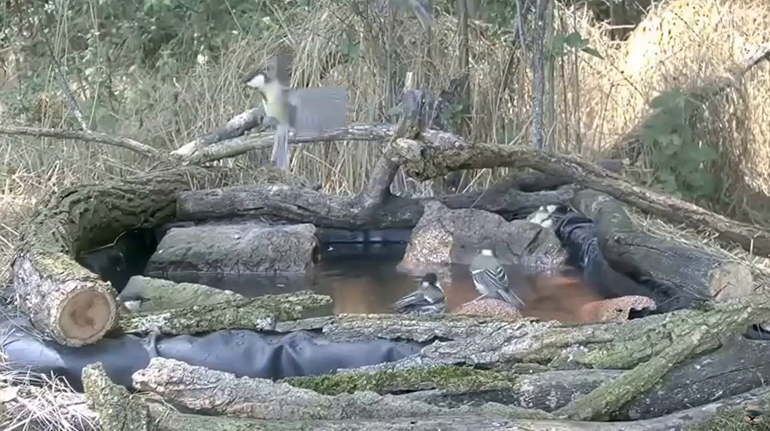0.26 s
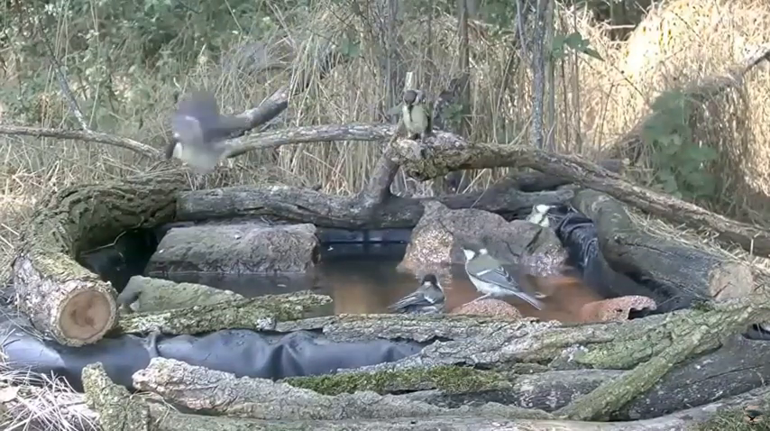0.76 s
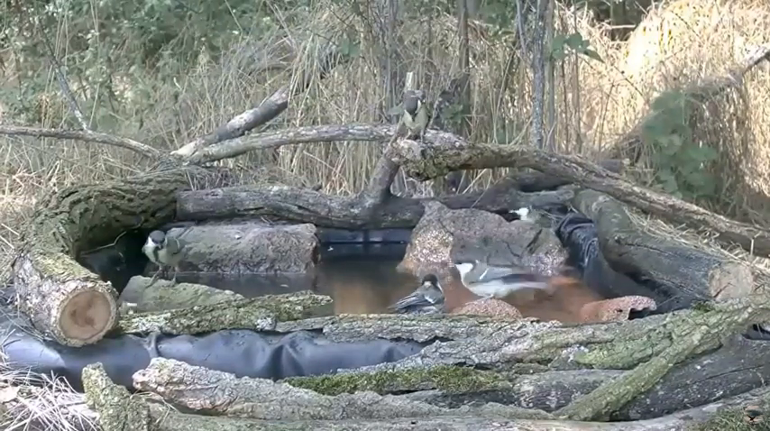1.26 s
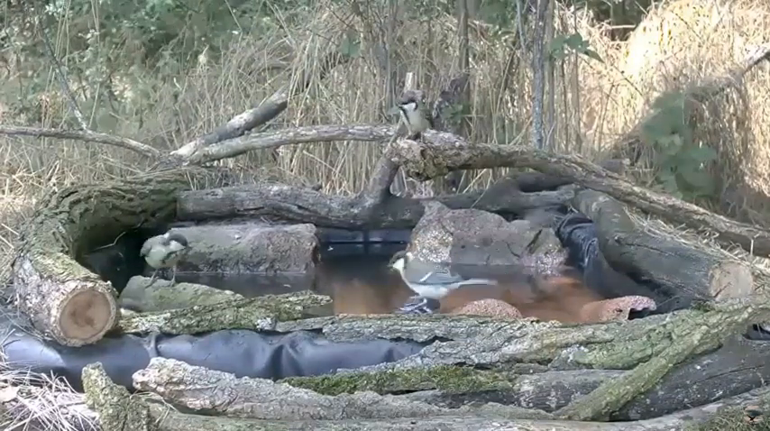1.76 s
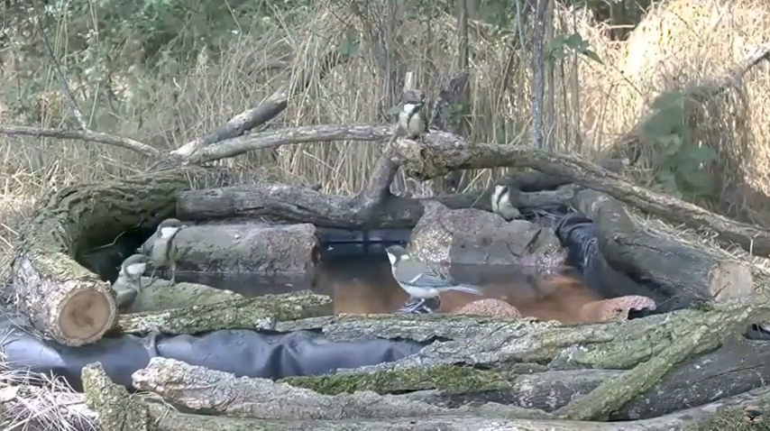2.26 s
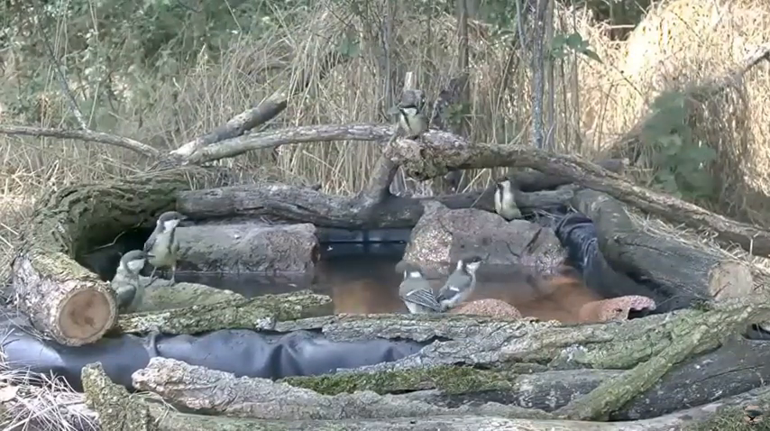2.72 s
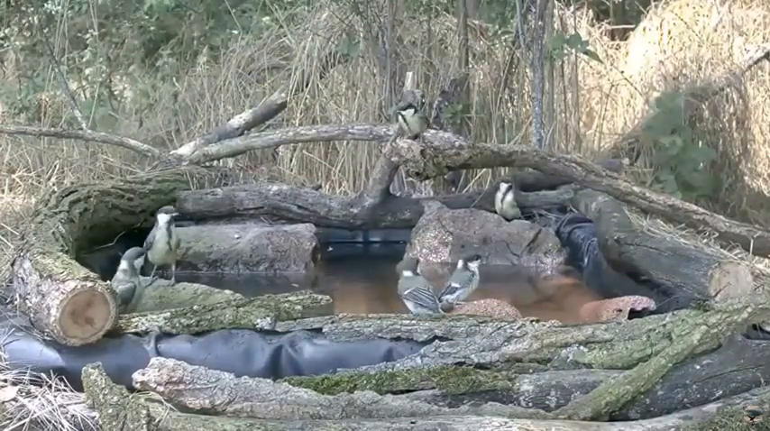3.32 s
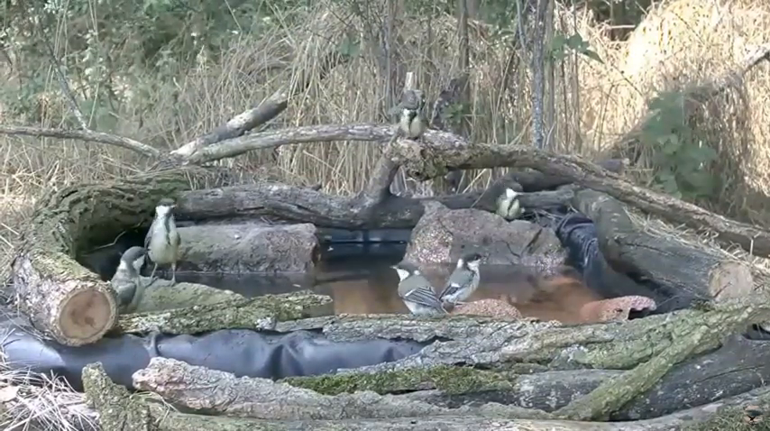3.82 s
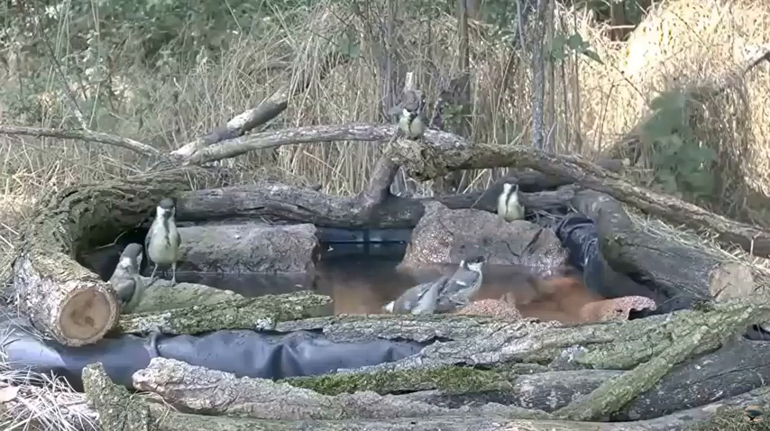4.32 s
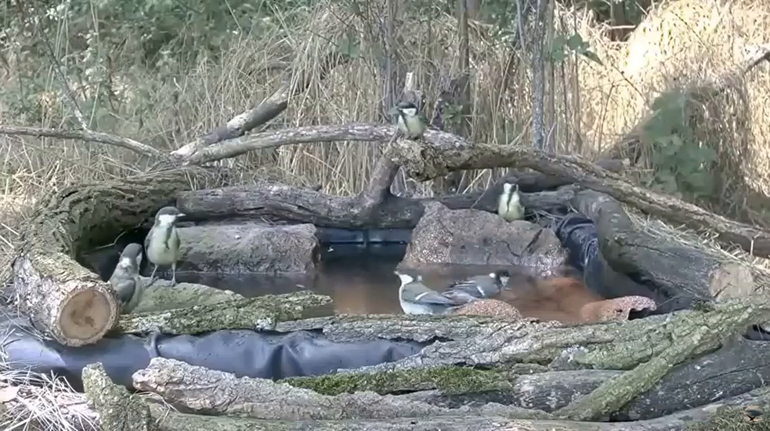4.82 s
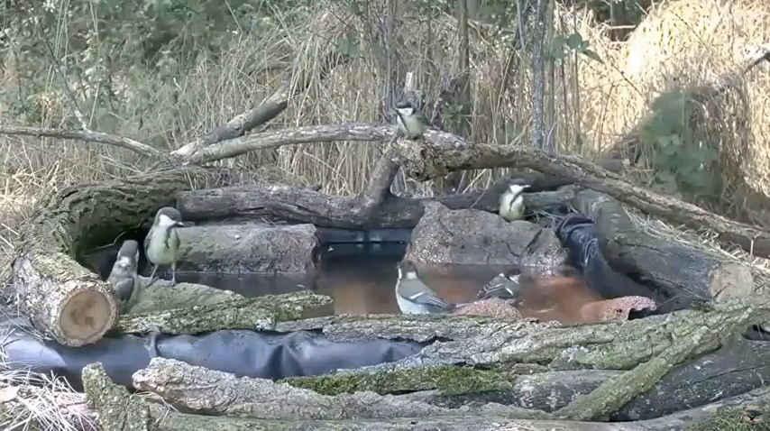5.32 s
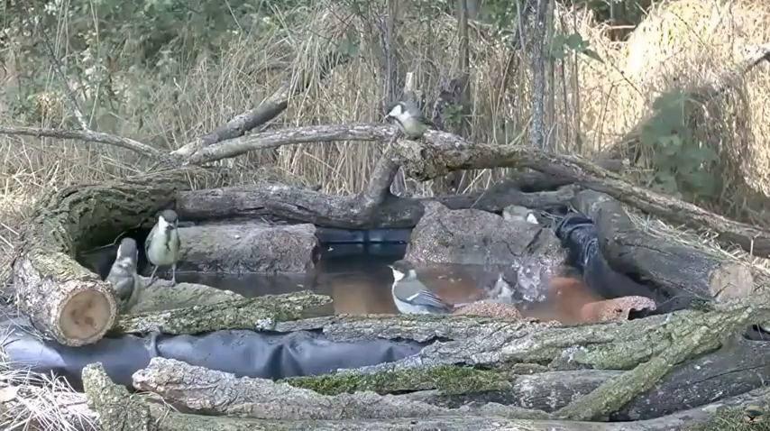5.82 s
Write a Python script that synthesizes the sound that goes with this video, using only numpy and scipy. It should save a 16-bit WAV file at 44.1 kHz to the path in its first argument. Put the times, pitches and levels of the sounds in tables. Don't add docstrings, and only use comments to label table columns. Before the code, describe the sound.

Outdoors, a small microphone sits close to a shallow pool where small songbirds bathe. A soft, breathing hiss of leaves and far traffic runs throughout, with low hum and lumpy air rumble. From 0 s wings flutter, wet feathers rustle and water sloshes; sharp ticks and a wood snap come at about 0.1 s, and a small splash at 0.6 s. Soft low wing thumps cluster around 1.6-1.75 s. A bubble plops at 1.9 s, and two hoarse, very high, tiny arched chirps follow at 1.93 and 2.0 s. A thin whistle and third chirp come at 2.6 s. It then calms, with wing puffs near 3.75 s and faint far whistles around 3.7-4.3 s. From 4.6 s bathing spray trickles; two lower, raspy chirps sound at 4.8 and 4.9 s over thin whistles. Loud snaps hit at 5.2 and 5.75 s, wings thump at 5.4 s, and splashing swells into a strong wing burst at 6.03 s.

```python
import sys
import numpy as np
from scipy import signal
from scipy.fft import rfft, irfft
from scipy.io import wavfile
from scipy.ndimage import uniform_filter1d

SR = 44100
rng = np.random.default_rng(int(sys.argv[2]) if len(sys.argv) > 2 else 0)


def put_to_file(sound):
    columns = np.atleast_2d(sound).T
    safe = np.clip(columns, -1, 1)
    whole_steps = np.round(safe * 32767)
    wavfile.write(sys.argv[1], SR, whole_steps.astype(np.int16))


def amplitude_ratio(level_db):
    exponent = np.asarray(level_db, float) / 20
    return 10 ** exponent


N = 268112


def rms_one(x):
    return x / np.sqrt(np.mean(x ** 2) + 1e-20)


def band(x, low_hz, high_hz):
    sos = signal.butter(2, [low_hz, min(high_hz, .45 * SR)], "band", fs=SR, output="sos")
    return signal.sosfilt(sos, x)


def drift(rate_hz):
    r = np.exp(-2 * np.pi * rate_hz / SR)
    slow = signal.lfilter([1], [1, -2 * r, r * r], rng.standard_normal(N + SR))[SR:]
    return rms_one(slow - slow.mean())


def coloured(x, spectrum):
    hz, level_db = np.transpose(spectrum)
    grid_hz = np.fft.rfftfreq(len(x), 1 / SR) + 1e-3
    gain_db = np.interp(np.log(grid_hz), np.log(hz), level_db, -90, -90)
    return rms_one(irfft(rfft(x) * amplitude_ratio(gain_db), len(x)))


def grains(per_s, spread_db, on_noise):
    sizes = amplitude_ratio(spread_db * np.minimum(rng.exponential(1, N), 5)) * rng.choice([-1, 1], N)
    clicks = sizes * (rng.random(N) < per_s / SR)
    return rms_one(clicks) + on_noise * rng.standard_normal(N)


def add(out, s, sound):
    at = int(s * SR)
    out[at:at + len(sound)] += sound[:N - at]


def bouts(rows, rest_db):
    t, power = np.arange(N) / SR, amplitude_ratio(2 * rest_db)
    for s, level_db, swell_s, ebb_s in rows:
        fall_db = 10 * np.where(t < s, (s - t) / swell_s, (t - s) / ebb_s)
        power = power + amplitude_ratio(2 * (level_db - fall_db))
    return 10 * np.log10(power)


def bushes(x):
    t = np.arange(SR // 2) / SR
    dying = amplitude_ratio(-60 * t / 0.33) + 2 * amplitude_ratio(-60 * t / .08)
    cloud = rng.standard_normal(len(t)) * dying * (t > .002)
    return signal.fftconvolve(x, cloud / np.sqrt(np.sum(cloud ** 2)))[:N]


# pitch_hz, level_db (per Hz)
HAZE_SPECTRUM = [(200, -14), (400, -16.5), (750, -15), (1000, -20.5), (1500, -20.5), (3300, -24),
                 (4500, -22.5), (5700, -29.5), (8000, -24.5), (11000, -26), (16000, -25.5)]


def haze():
    hiss = [coloured(rng.standard_normal(N), HAZE_SPECTRUM) for _ in range(2)]
    together, out = drift(22), 0
    for k, low_hz in enumerate(310 * 2 ** np.arange(6)):
        breathing = amplitude_ratio(.7 * together + .9 * drift(14))
        out = out + breathing * band(hiss[k % 2], low_hz, 2 * low_hz)
    return amplitude_ratio(-47.5) * rms_one(out)


# pitch_hz, level_db (per Hz)
RUMBLE_SPECTRUM = [(15, -11), (35, -1.5), (70, -0.5), (110, -3), (200, -2.5)]
# pitch_hz, level_db (per Hz)
HUM_SPECTRUM = [(60, -11), (120, -5.5), (200, 0), (300, -0.5), (400, -11.5), (600, -24.5)]
# height_s, rumble_db, swell_s, ebb_s
PUFFS_OF_AIR = [(.09, -32.5, 0.079, 0.079), (.4, -33.5, 0.041, 0.12), (.54, -30.5, .02, 0.16),
                (.72, -41, 0.036, 0.039), (1.08, -35.5, 0.024, 0.094), (1.45, -34.5, 0.17, 0.3),
                (1.65, -26, 0.051, 0.057), (1.75, -31, 0.056, 0.089), (1.96, -36.5, 0.12, .02),
                (2.15, -44, .04, 0.057), (2.41, -35, 0.089, .04), (3.76, -34.5, 0.075, 0.2),
                (3.93, -42, 0.087, 0.13), (4.37, -38, 0.12, 0.049), (5.21, -38, 0.029, 0.14),
                (5.45, -25, 0.052, 0.044), (5.94, -42, 0.085, 0.035), (6.07, -26.5, 0.061, 0.046)]


def gusts():
    puff_db = bouts(PUFFS_OF_AIR, rest_db=-55)
    rumble = amplitude_ratio(puff_db - 1.5 + 3 * drift(15)) * coloured(rng.standard_normal(N), RUMBLE_SPECTRUM)
    hum = np.hypot(amplitude_ratio(-45.5 + 1.43 * drift(1.75)), amplitude_ratio(puff_db - 8.5))
    return rumble + hum * amplitude_ratio(1.8 * drift(16)) * coloured(rng.standard_normal(N), HUM_SPECTRUM)


# start_s, level_db
FLYING = [(0.0, -44), (0.3, -43), (0.6, -49.5), (1.07, -46.5), (1.3, -50.5), (1.83, -48), (2.2, -52.5),
          (2.55, -50), (3.05, -50), (3.3, -54), (3.8, -50), (4.4, -52.5), (5.05, -55), (5.6, -56.5),
          (6.08, -48.5)]
# height_s, spray_db, swell_s, ebb_s
BATHING = [
    (0.59, -45.5, .1, 0.18),
    (4.72, -45.5, 0.16, 0.6),
    (5.3, -45.5, 0.094, 0.19),
    (5.78, -48, .1, 0.11),
    (5.93, -43, 0.3, 0.086),
    (6.06, -42.5, 0.047, 0.032),
]


def stir():
    s, level_db = np.transpose(FLYING)
    return np.interp(np.arange(N) / SR, s, level_db), bouts(BATHING, rest_db=-66)


# pitch_hz, level_db (per Hz)
FEATHER_SPECTRUM = [(3000, -12), (5500, -8), (7000, 3), (9000, -1.5), (11000, -4.5), (15500, -18)]


def rustle(rustle_db, beat_db):
    feathers = coloured(grains(per_s=2000, spread_db=3.5, on_noise=1), FEATHER_SPECTRUM)
    return amplitude_ratio(rustle_db - 0.5 + beat_db) * feathers


# pitch_hz, level_db (per Hz)
SLOSH_SPECTRUM = [(500, -0.5), (1000, -7.5), (1500, 0), (2200, -8), (4000, -15)]


def slosh(flutter_db, beat_db):
    slosh_db = -53.5 + 1.51 * (flutter_db + 50.5)
    pool = coloured(grains(per_s=300, spread_db=3.5, on_noise=1.25), SLOSH_SPECTRUM)
    return amplitude_ratio(slosh_db - 3.0 + beat_db) * pool


def trickle(spray_db):
    clicks = grains(per_s=630, spread_db=4.5, on_noise=0.9)
    dealt, out = rng.integers(0, 8, N), 0
    for k, hz in enumerate(np.geomspace(2350, 3600, 8)):
        r, w = amplitude_ratio(-60 * hz / (40.0 * SR)), 2 * np.pi * hz / SR
        out = out + signal.lfilter([np.sin(w)], [1, -2 * r * np.cos(w), r * r], clicks * (dealt == k))
    level_db = 10 * np.log10(amplitude_ratio(2 * -57) + amplitude_ratio(2 * (spray_db + 5)))
    return amplitude_ratio(level_db - 9.5) * rms_one(out)


def specks(rustle_db):
    when, size, dull, airy = rng.random((70, 4)).T
    s = when * (N / SR - .1)
    level_db = rustle_db[(s * SR).astype(int)] + 20 + 5 * (2 * size - 1)
    return list(zip(s, level_db, 2 - 20 * dull, -4 - 20 * airy))


# start_s, peak_db, dull_db (re peak), airy_db (re peak)
DROP_TICKS = [(0.023, -17, -10, -16), (0.0486, -26.5, -20, -27), (0.118, -6, -12, -21),
              (0.193, -19, -8, -12), (0.33, -10.5, -9, -10), (0.379, -13, -5, -9), (0.624, -17, -13, -18),
              (0.7073, -20, -2, -17), (0.946, -16, -8, -20), (0.9946, -19, -7, -21),
              (1.102, -12, -8.5, -12), (1.510, -15.5, -6, -7), (1.5657, -21, -6, -18),
              (1.5794, -20, -6, -4), (1.736, -18, -7, -9), (1.9002, -13, -0.5, -24),
              (2.196, -30.5, 9.5, -10), (3.6691, -19, -24, -27), (4.132, -18, -13, -19),
              (4.1922, -17.5, -6, -15), (4.5017, -13.5, -5, -21), (4.522, -17, -9, -16),
              (4.563, -15, -8, -9), (5.2035, -6.5, 0.5, -29), (5.3915, -19.5, -4, -1),
              (5.754, -11, -6, -29), (5.883, -9, -27, -12), (5.927, -35, -16, -22),
              (6.0184, -10.5, -22, -20), (6.042, -9, -9, -23)]


def ticks(rustle_db):
    out, t = np.zeros(N), np.arange(SR // 16) / SR
    sharpness = 0.56
    click = amplitude_ratio(-60 * t / 0.0033)
    spray = (1 - np.exp(-t / 0.00061)) * amplitude_ratio(-60 * t / 0.066)
    shape = sharpness * click + 0.37 * (1 - sharpness) * spray
    for s, peak_db, dull_db, airy_db in list(DROP_TICKS) + specks(rustle_db):
        burst = rng.standard_normal(len(t)) * shape
        bright = band(burst, 5500, 10000) + .3 * band(burst, 3300, 5500)
        parts = [bright, band(burst, 1100, 3300), band(burst, 10500, 16000)]
        bright, dull, airy = [p / np.abs(p).max() for p in parts]
        tick = bright + amplitude_ratio(dull_db) * dull + amplitude_ratio(airy_db) * airy
        add(out, s + 0.00048, amplitude_ratio(peak_db - 9.5) * tick)
    return out


# start_s, peak_db, pitch_hz
WING_STROKES = [(0.024, -22, 129), (0.115, -18.5, 129), (0.514, -18, 149), (1.09, -43, 242),
                (1.435, -24, 113), (1.627, -13, 79.5), (1.666, -11, 132), (1.736, -20, 167),
                (1.749, -14, 106), (2.137, -29, 116), (2.382, -29, 96), (3.728, -25, 141),
                (3.758, -14, 154), (3.774, -17, 112), (3.788, -13, 192), (5.396, -14.5, 88),
                (5.423, -16, 85.5), (5.432, -9.5, 135), (5.46, -18, 80), (5.477, -11, 141),
                (5.499, -25, 76), (6.016, -43, 191), (6.029, -6.5, 226), (6.041, -5, 134)]


def wings():
    out = np.zeros(N)
    for s, peak_db, hz in WING_STROKES:
        cycles = np.arange(int(4 * SR / hz)) * hz / SR
        swell = 2.0 * cycles / 0.84 * np.exp(-cycles / 0.58)
        swing = np.sin(2 * np.pi * cycles + rng.uniform(0, 2 * np.pi))
        add(out, s, amplitude_ratio(peak_db + 1.0) * swell * swing)
    return out


# start_s, peak_db
WOOD_SNAPS = [
    (.1205, -22),
    (.3797, -28),
    (1.0925, -32),
    (1.5112, -30),
    (4.744, -30),
    (5.1575, -30),
    (5.2052, -9),
    (5.7525, -26),
    (5.7556, -8),
    (5.8838, -27),
]


def snaps():
    clicks, pulse = np.zeros(N), np.array([1, -.6])
    for s, peak_db in WOOD_SNAPS:
        add(clicks, s, amplitude_ratio(peak_db + 4.5) * pulse)
        add(clicks, s + 0.00084, amplitude_ratio(peak_db - 18) * pulse)
    return band(clicks, 1500, 13000) + band(clicks, 6300, 10200)


# start_s, peak_db, pitch_hz, t60_s
BUBBLES = [(1.9076, -16.5, 1444, 0.012), (1.909, -26, 1120, 0.012), (1.6603, -36, 1660, 0.01),
           (4.707, -45, 3270, 0.028), (5.863, -41, 1500, 0.016), (6.02, -36, 645, 0.023),
           (4.805, -39, 370, 0.053), (2.628, -38, 1850, 0.017), (3.212, -49.5, 1835, 0.087),
           (3.4366, -47, 1750, 0.057), (4.134, -41.5, 1340, 0.017), (4.5698, -36.5, 1796, 0.055),
           (5.172, -43.5, 1660, 0.12), (5.184, -41.5, 1520, 0.043), (5.205, -19.5, 1120, 0.01),
           (5.205, -28, 725, 0.064), (2.291, -47.5, 1890, 0.035), (3.925, -49.5, 2180, 0.026),
           (5.206, -28, 955, 0.026), (5.7548, -33, 1790, 0.0062), (5.8915, -39, 2940, 0.022),
           (6.043, -41, 3080, 0.027), (6.0518, -24, 1418, 0.058)]


def plops():
    out, t = np.zeros(N), np.arange(SR // 8) / SR
    wobble_db = 3 * np.tile(drift(150), 2)
    for s, peak_db, hz, t60_s in BUBBLES:
        pitch_hz = hz * (1 + 0.11 * np.exp(-t / 0.0026) + 0.2 * t)
        rough_db = wobble_db[int(s * SR) - len(t) // 2:][:len(t)]
        shape = (1 - np.exp(-t / 0.00042)) * amplitude_ratio(-60 * t / t60_s + rough_db)
        add(out, s, amplitude_ratio(peak_db + 8.5) * shape * np.sin(2 * np.pi * np.cumsum(pitch_hz) / SR))
    return out


# start_s, length_s, level_db
HOARSE_BREATHS = [
    (1.912, 0.026, -17.5),
    (1.976, 0.03, -20.5),
    (2.629, 0.021, -15.5),
    (4.794, 0.025, -14.5),
    (4.861, 0.047, -18),
]


def rasps():
    out, white = np.zeros(N), rng.standard_normal(N)
    breath = rms_one(band(band(white, 7000, 10000), 7000, 10000))
    breath += amplitude_ratio(-10.5) * rms_one(band(white, 1900, 4600))
    breath += amplitude_ratio(-19) * rms_one(band(white, 9500, 14500))
    for s, length_s, level_db in HOARSE_BREATHS:
        n = int(length_s * SR)
        swell = np.sqrt(np.linspace(0, 1, n)) * signal.windows.tukey(n, .7)
        add(out, s, amplitude_ratio(level_db) * swell * breath[int(s * SR):][:n])
    return out


def arch(s, held, crest_hz, level_db, run_up, share, shoulder_db, crest_db, closing_db, crest):
    open_hz = 7210
    climb_s, climb_hz = .0055, 4335
    foot_hz = max(climb_hz - 270000 * (run_up - climb_s), 1692)
    bend_hz = foot_hz + 0.33 * (climb_hz - foot_hz)
    shoulder_hz = open_hz + share * (crest_hz - open_hz)
    shut = s + held
    return [(s - run_up, foot_hz, -41),
            (s - .5 * (run_up + climb_s), bend_hz, -31),
            (s - climb_s, climb_hz, -26),
            (s, open_hz, level_db),
            (s + 0.25 * held, shoulder_hz, level_db + shoulder_db),
            (s + crest * held, crest_hz, level_db + crest_db),
            (shut, open_hz, level_db + closing_db),
            (shut + .0015, 6100, -28 + closing_db),
            (shut + .0085, 2200, -35 + closing_db)]


def whistle(s, length, hz, level_db, rise, sag_hz, fade_db):
    held = length - rise - .008
    tired_hz, tired_db = hz - sag_hz * held, level_db - fade_db * held
    return [(s, .6 * hz, level_db - 25),
            (s + .5 * rise, .9 * hz, level_db - 5),
            (s + rise, hz, level_db),
            (s + rise + held, tired_hz, tired_db),
            (s + length, .97 * tired_hz, tired_db - 25)]


# multiple, level_db (at 3 kHz pitch)
VOICE_OVERTONES = [(2, 0), (3, -8), (4, -12)]


def chirp(rows, overtones_db, unsteady_db):
    s, hz, level_db = np.transpose(rows)
    t = np.arange(s[0], s[-1], 1 / SR)
    hz = uniform_filter1d(np.interp(t, s, hz), size=110, mode="nearest")
    level_db = uniform_filter1d(np.interp(t, s, level_db), size=30, mode="nearest")
    phase = 2 * np.pi * np.cumsum(hz) / SR
    tone = np.sin(phase)
    for k, step_db in VOICE_OVERTONES:
        beak_db = 12 * np.exp(-((k * hz - 8000) / 2200) ** 2)
        gain_db = overtones_db + step_db - 8 * (hz / 1000 - 3) + beak_db
        tone += amplitude_ratio(gain_db) * np.sin(k * phase) * (k * hz < .45 * SR)
    flutter_db = unsteady_db * drift(60)[:len(t)]
    return amplitude_ratio(level_db + flutter_db) * tone * signal.windows.tukey(len(t), .08)


# open_s (beak opens), held_s (stays open), crest_hz, level_db, run_up_s
ARCHED_CHIRPS = [
    (1.933, .025, 9350, 0.5, 0.01),
    (2.003, .0215, 9050, 2.5, 0.017),
    (2.649, 0.024, 8910, -1.5, .015),
    (4.813, .0205, 7990, -5.5, .024),
    (4.891, .024, 8170, -3, 0.014),
]
# shoulder_share (of the climb, 0-1), shoulder_db, crest_db, closing_db (re its level),
# crest_share (of the open time)
ARCH_MANNERS = [
    (0.6, 1, -9, 2, .82),
    (0.3, 4, -4.5, -9.5, 0.665),
    (.8, 0.5, 3.5, -1.5, .78),
    (.97, 2.5, -6, -3, 0.96),
    (0.77, 0.5, -2, -1.5, 0.73),
]
# start_s, length_s, held_hz, level_db, rise_s
FAR_WHISTLES = [
    (2.599, .041, 7750, -21, .018),
    (3.678, .055, 7680, -27, .018),
    (4.654, .14, 4530, -36, .034),
    (4.832, .17, 4460, -47, .002),
    (3.94, .10, 2500, -56, .08),
    (4.045, .225, 2720, -51, .012),
]
# sag_hz_per_s, fade_db_per_s
WHISTLE_TIRING = [
    (0, 0),
    (1500, 80),
    (450, 50),
    (400, 50),
    (0, 0),
    (1650, -15),
]
# echo_lag_s, echo_db (off the water), scatter_db (bushes), overtones_db
CHIRP_PLACES = [(.0012, -3, -13, -6), (.0012, -3, -12, 2), (.0013, -5, -14, -6), (.0016, -8, -16, -3),
                (.0011, -5, -13, -6), (.002, -12, -8, -8), (.003, -5, -5, -14), (.006, -6, -4, -28),
                (.006, -6, -2, -28), (.003, -8, -4, -34), (.003, -8, -4, -34)]


def birds():
    near, far = rasps(), np.zeros(N)
    calls = [arch(*a, *manner) for a, manner in zip(ARCHED_CHIRPS, ARCH_MANNERS)]
    calls += [whistle(*w, *tiring) for w, tiring in zip(FAR_WHISTLES, WHISTLE_TIRING)]
    for rows, (lag_s, echo_db, wet_db, overtones_db) in zip(calls, CHIRP_PLACES):
        voice = chirp(rows, overtones_db, 4.5 + 0.3 * wet_db) / (1 + amplitude_ratio(echo_db))
        start_s = rows[0][0]
        add(near, start_s, voice)
        add(near, start_s + lag_s, amplitude_ratio(echo_db) * voice)
        add(far, start_s, amplitude_ratio(wet_db) * voice)
    return near + bushes(far)


def scene():
    flutter_db, spray_db = stir()
    rustle_db = 10 * np.log10(amplitude_ratio(2 * flutter_db) + amplitude_ratio(2 * spray_db))
    beat_db = 2.2 * drift(25)
    air = haze() + gusts() + wings()
    feathers = rustle(rustle_db, beat_db) + slosh(flutter_db, beat_db)
    water = trickle(spray_db) + ticks(rustle_db) + snaps() + plops()
    wet = amplitude_ratio(-12) * bushes(water)
    return (air + feathers + water + wet + birds())[None]


def roll_off(x):
    return signal.sosfilt(signal.butter(12, 17000, fs=SR, output="sos"), x)


def record(dry):
    fine = signal.resample_poly(dry, up=2, down=1, axis=1)
    size = np.abs(fine)
    soft = .45 + .27 * np.tanh((size - .45) / .27)
    rounded = np.sign(fine) * np.where(size < .45, size, soft)
    low_pass = signal.cheby2(14, 50, 1.03 * 16000, fs=SR, output="sos")
    mix = signal.sosfilt(low_pass, signal.resample_poly(rounded, up=1, down=2, axis=1))
    return roll_off(mix)


dry = scene()
out = record(dry)
put_to_file(out)
```